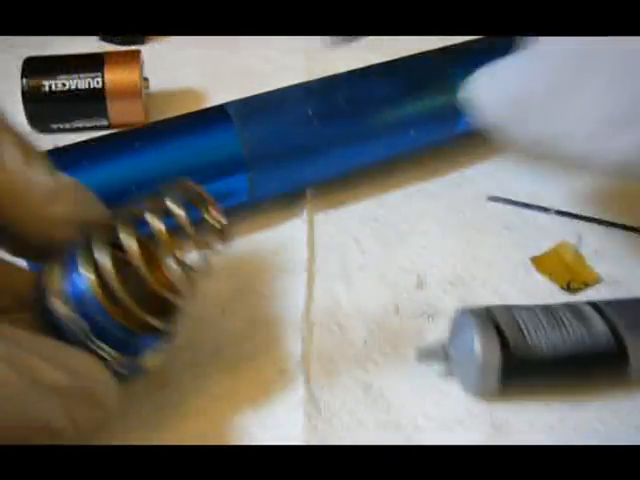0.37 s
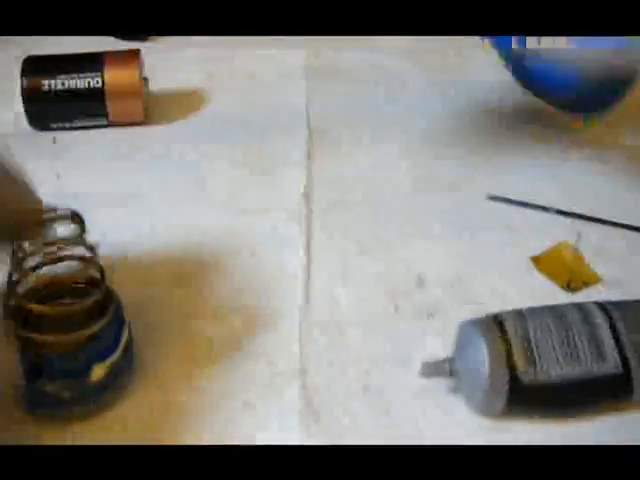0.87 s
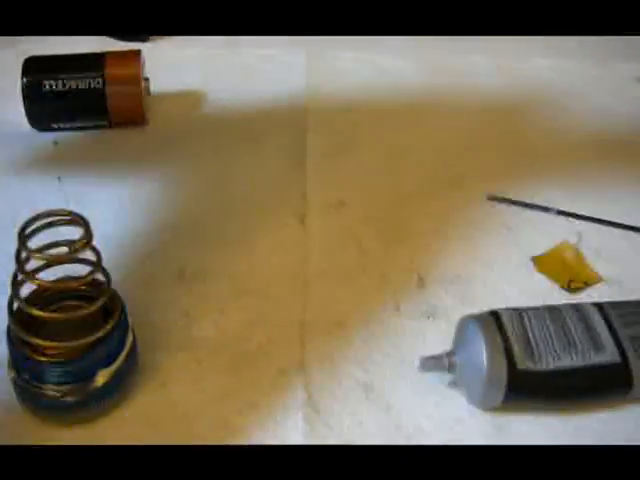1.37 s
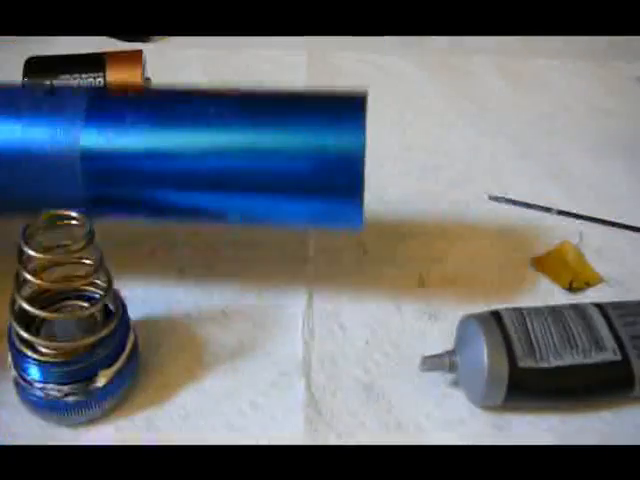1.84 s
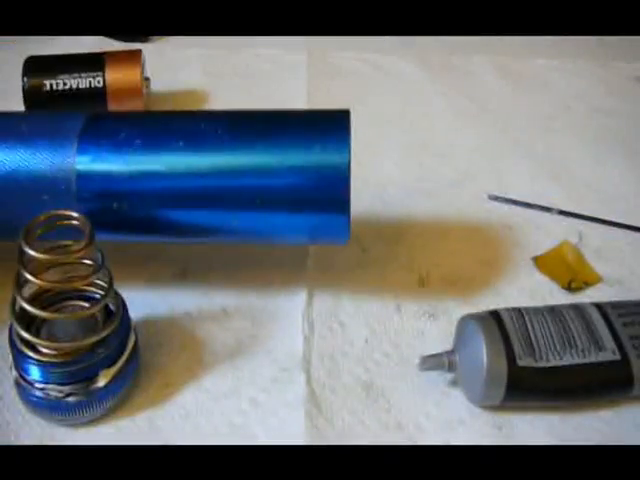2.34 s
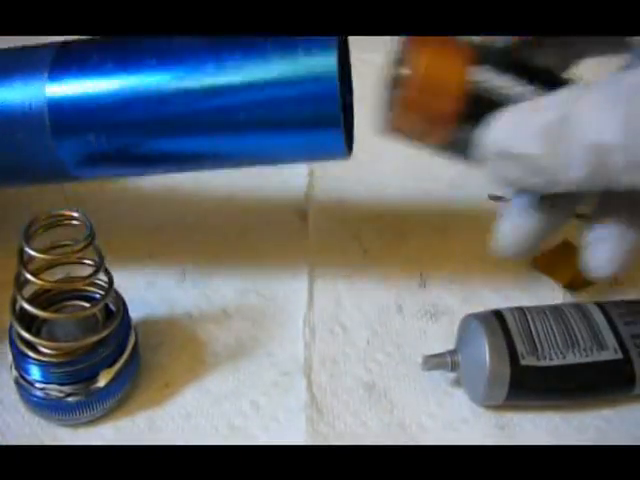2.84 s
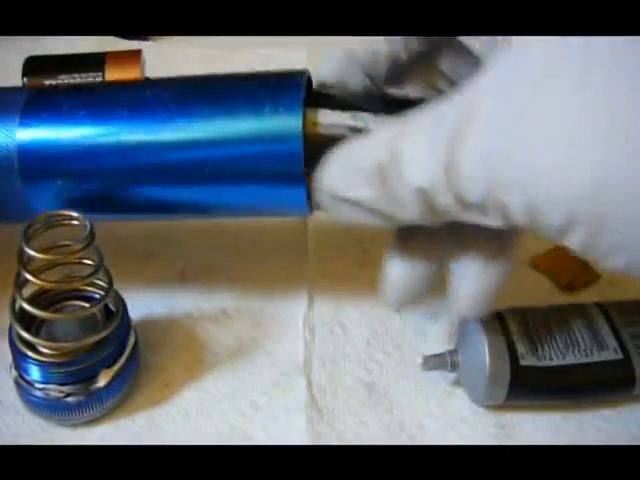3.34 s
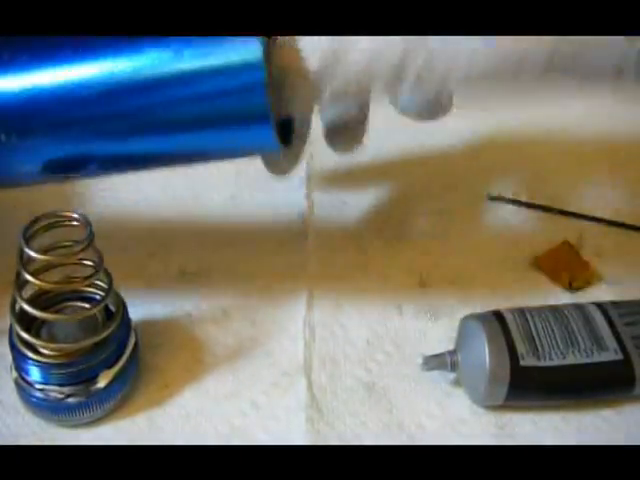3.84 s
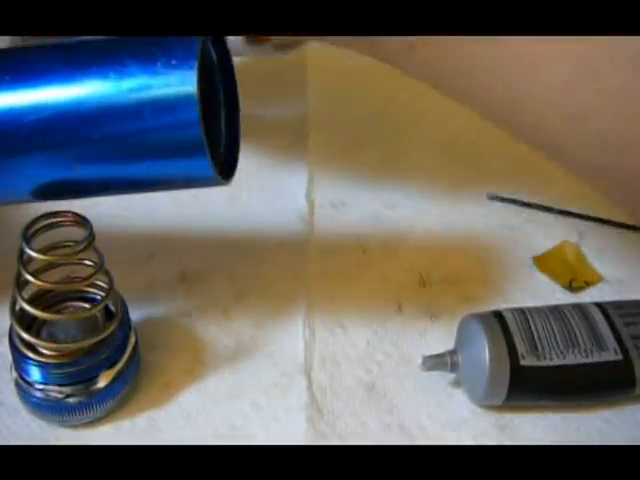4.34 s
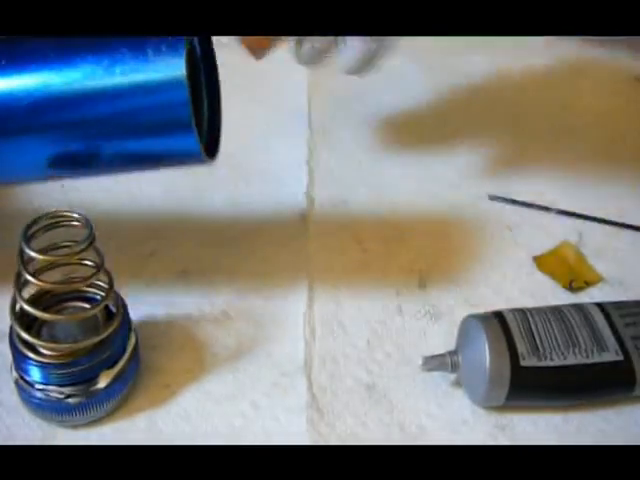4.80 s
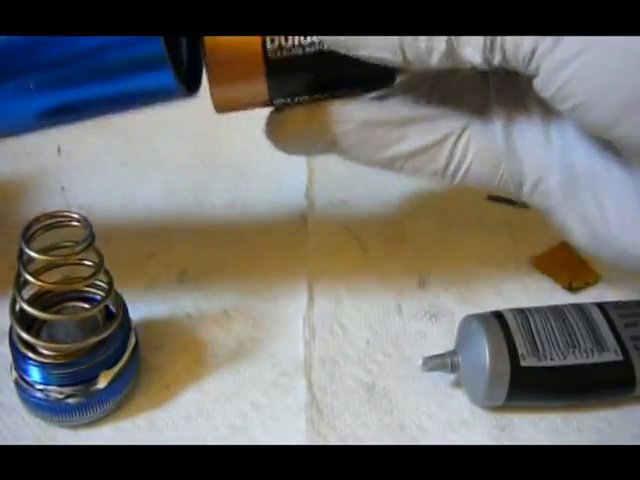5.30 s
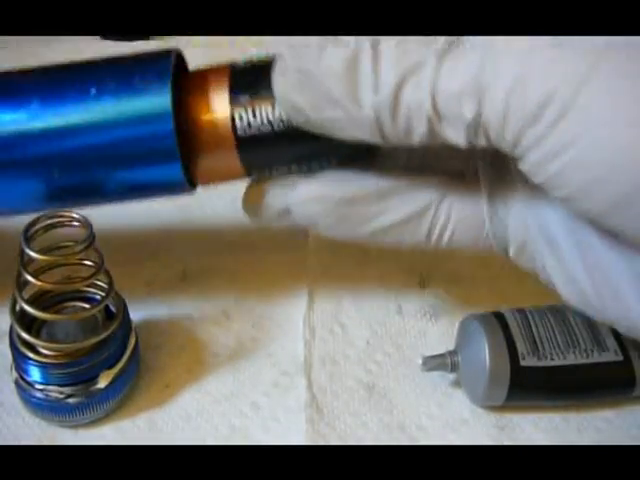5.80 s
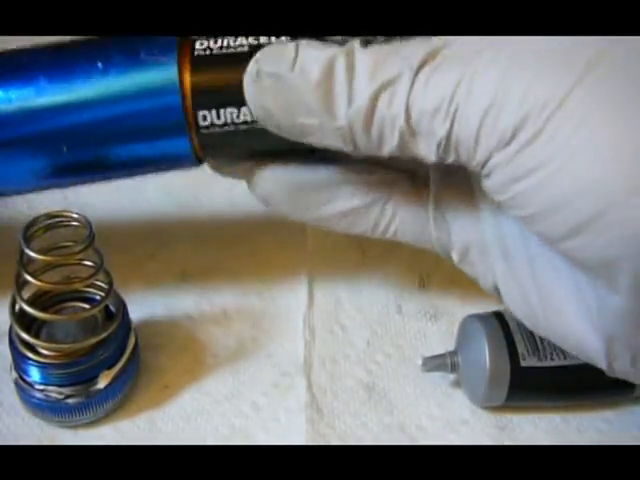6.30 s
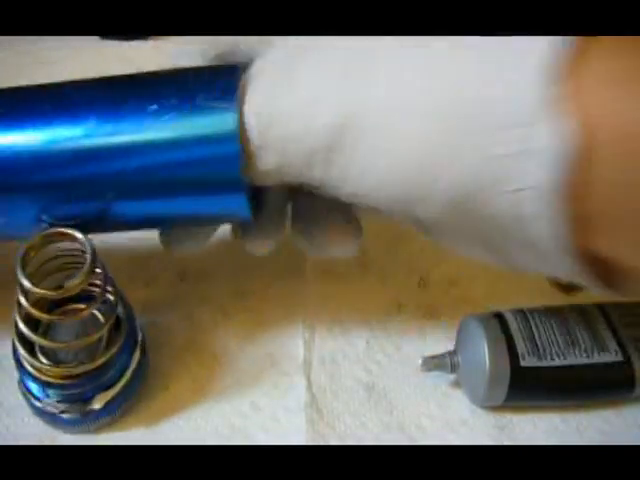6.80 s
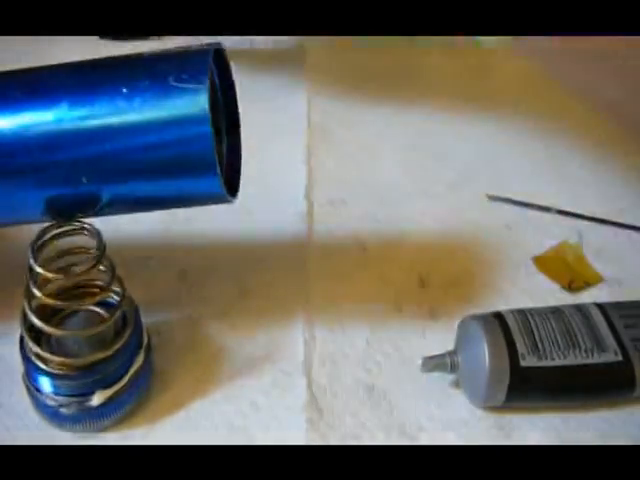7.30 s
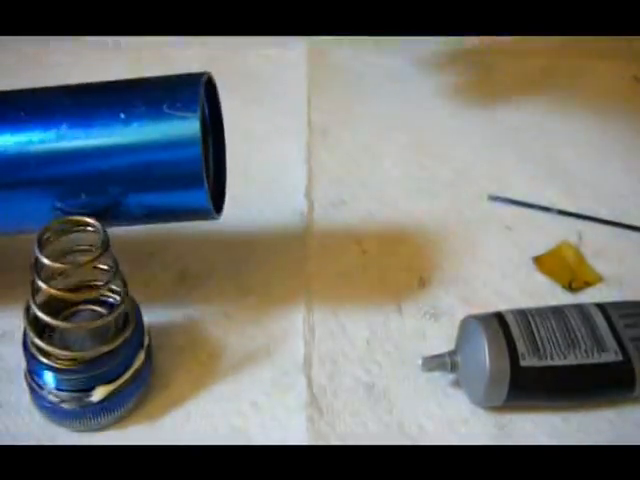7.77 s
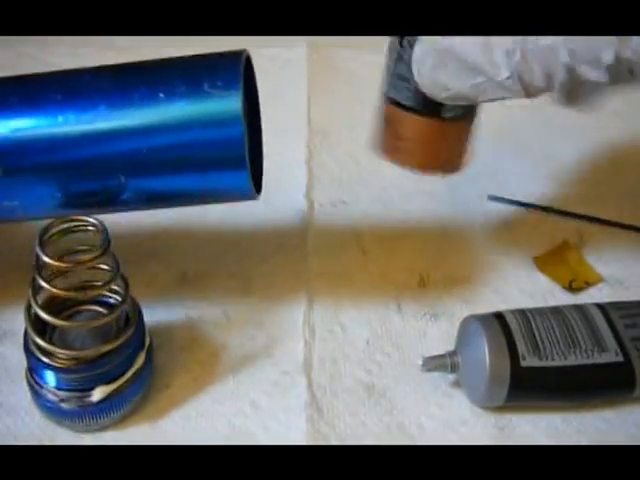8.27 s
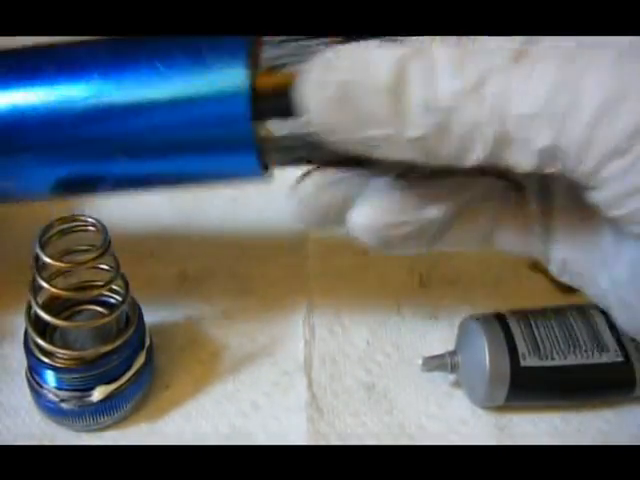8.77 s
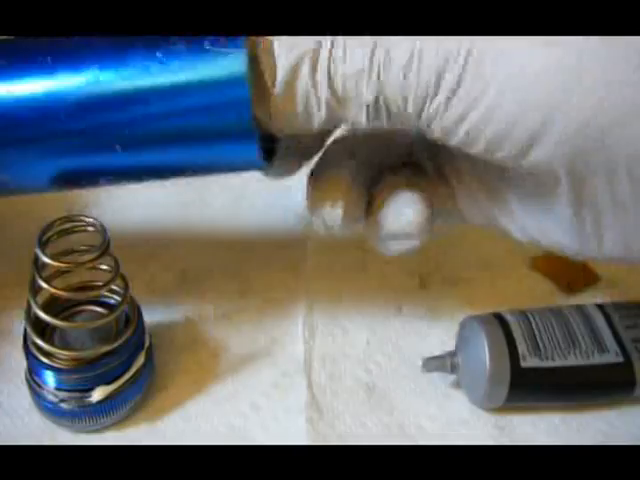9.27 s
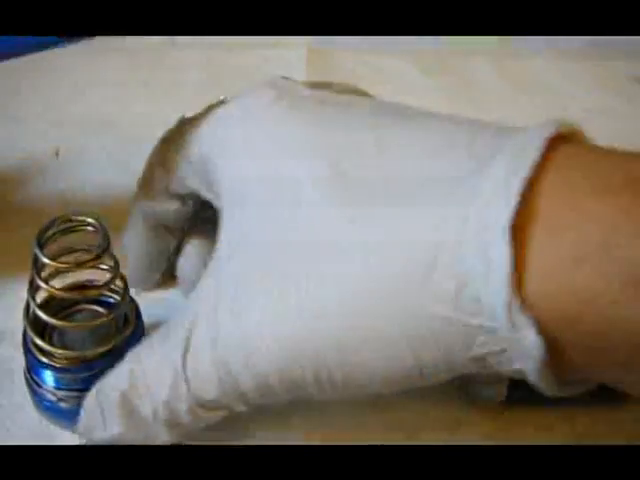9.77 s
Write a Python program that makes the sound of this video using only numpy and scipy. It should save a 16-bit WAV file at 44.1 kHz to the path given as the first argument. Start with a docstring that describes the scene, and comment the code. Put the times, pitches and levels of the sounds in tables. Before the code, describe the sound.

Close, gritty small-camera sound in a quiet room. A rough scrape and knocks open it, then near silence. A solid knock follows, then three clusters of metallic clinks and short rattles as batteries enter a metal tube, with padded table thumps beneath. Faint glove scuffs and steady hush fill the gaps before a last busy clatter and soft thud.

```python
"""Batteries into a metal tube

Gloved hands slide steel-cased batteries into an aluminium tube held over a padded table in a quiet room.
Each contact rings decaying tube modes near 2 kHz with a dull knock and a crack; runs of light touches rattle.
Blows boom in the table's own modes, while random slips make the rumble of drags and the scuffs of a glove.
Shaped noise makes the hush. A small camera clips and samples at 8 kHz, then straight lines join the samples,
which mirrors the sound into the treble."""
import sys
import numpy as np
from scipy import signal
from scipy.fft import rfft, irfft
from scipy.io import wavfile
from scipy.ndimage import map_coordinates

SR = 44100
rng = np.random.default_rng(int(sys.argv[2]) if len(sys.argv) > 2 else 0)


def store_pcm(level_fs):
    """Save levels as 16-bit WAV."""
    pcm = np.round(np.clip(level_fs, -1, 1) * 32767).astype(np.int16)
    wavfile.write(sys.argv[1], SR, np.atleast_2d(pcm).T)


def convert_level_to_amplitude(level_db):
    """Map a level in decibels to its linear amplitude factor."""
    exponent = np.asarray(level_db, float) / 20
    return 10 ** exponent


N = 435708   # length [samples]

# colour of the room hush: (frequency [Hz], relative density [dB])
HUSH_COLOUR = [(15, -53), (25, -6.5), (55, -13), (97, -10), (171, -8), (211, -6.5), (245, -4.5), (309, -6),
               (462, -7), (817, -4.5), (947, -7), (1070, -7.5), (3900, -13.5), (5070, -34), (8580, -120)]
# how loud the hush is between 1.2 and 3 kHz: (time [s], level [dB])
HUSH_LEVEL = [(0, -48.5), (1, -49.5), (3.5, -45), (3.68, -53), (3.85, -50), (6.85, -49.5), (7.1, -54.5),
              (7.5, -51.5), (8.7, -49), (9.3, -51.5), (9.88, -49.5)]
# low table modes: (frequency [Hz], level [dB], t60 [s])
BOOM_MODES = [(109.8, -6, 0.22), (129.7, -6, 0.12)]
# modes of the table board: (frequency [Hz], level [dB], t60 [s])
BOARD_MODES = [(198.2, -9.5, 0.18), (238.3, -9, 0.076), (303.4, -3.5, 0.053), (405.5, -7.5, 0.068),
               (502, -5.5, 0.022)]
# blows that reach the table top: (time [s], boom [dB], board [dB], board pitch favoured by the spot [Hz])
TABLE_THUMPS = [(0.408, -28, -37, 200), (0.664, -20, -19.5, 195), (0.682, -24, -21.5, 195),
                (0.886, -37, -48, 198), (2.177, -9.5, -15, 276), (2.205, -34, -16, 247),
                (2.956, -33, -12.5, 408), (2.981, -17, -15, 350), (3.254, -23, -43, 300),
                (3.297, -24, -26, 250), (3.367, -23, -25, 300), (3.728, -26, -26, 250),
                (4.315, -26.5, -31, 200), (4.952, -55, -20, 300), (5.002, -45, -27, 250),
                (5.307, -55, -31, 239), (5.041, -22, -6, 340), (5.071, -38, -25, 300),
                (5.684, -49, -20.5, 347), (5.849, -25, -17.5, 260), (5.93, -40, -19, 260),
                (6.367, -52, -26, 450), (6.44, -26, -15.5, 280), (6.704, -33, -16, 300),
                (7.997, -37.5, -25.5, 218), (8.978, -35, -22, 300), (9.11, -56, -22.5, 453),
                (9.196, -53, -23, 422), (9.52, -27, -20, 250), (9.535, -39, -27, 220)]
# jolts that shift things on the pad, which then settle:
# (time [s], table boom [dB], board [dB], tube scrape [dB], fade [dB/s])
PAD_JOLTS = [(0.09, -52, -31.5, -40, 141), (0.292, -62, -65, -37, 48), (2.99, -27.5, -34, -37.5, 101),
             (3.28, -33, -33.5, -39.5, 73), (5.05, -30, -19.5, -31.5, 261), (5.848, -40, -34, -41.5, 71),
             (6.22, -35, -28, -31, 180), (6.441, -57, -28.5, -31.5, 180), (6.71, -38.5, -32, -35, 72),
             (7.43, -38.5, -33.5, -53, 75), (3.44, -42, -45, -55, 53), (8.69, -58, -55, -41, 203),
             (8.97, -64, -43, -47, 81)]
# a hand drags or presses, swelling and easing:
# (start [s], length [s], table boom [dB], board [dB], tube scrape [dB])
HAND_SLIDES = [(-0.03, 0.083, -24.5, -14, -12.5), (.04, 0.052, -28, -13.5, -22.5),
               (0.4, 0.72, -60, -61, -47), (1.7, 0.43, -65, -62, -49), (2.448, 0.22, -51, -70, -57),
               (2.76, 0.19, -37.5, -48, -60), (3.708, 0.19, -39, -41, -47), (3.881, .27, -32, -34.5, -36.5),
               (4.08, 0.21, -45, -51.5, -70), (4.3, 0.33, -50, -53.5, -50.5),
               (6.86, 0.18, -39.5, -42.5, -71), (7.485, 0.31, -61, -40.5, -72)]
# a glove scuffs along the tube and stirs the air inside: (start [s], length [s], level [dB])
GLOVE_SCUFFS = [(2.8, 0.15, -50), (2.97, 0.18, -44), (3.72, 0.086, -38), (3.89, .24, -36),
                (7.432, .04, -36.5), (7.505, 0.039, -36.5)]
# resonances of the air in the tube: (frequency [Hz], level [dB], t60 [s])
AIR_COLUMN_MODES = [(886, -0.5, .05), (931, 5.5, 0.024), (1148, -6, 0.037)]
# ringing modes of the tube wall: (frequency [Hz], level [dB], t60 [s])
WALL_MODES = [(1844, -3.5, 0.025), (1941, -6, 0.036), (1992, -5.5, 0.057), (2050, -3, 0.028)]
# upper ring, heard on blows near the open rim: (frequency [Hz], level [dB], t60 [s])
RIM_MODES = [(3434, 2, 0.19)]
# dull knock of a contact: (frequency [Hz], level [dB], t60 [s])
KNOCK_MODES = [(635, -4, 0.032), (765, -0.5, 0.023), (875, -10.5, 0.041), (935, -7, 0.042),
               (1053, -8, 0.043), (1222, -7.5, 0.033), (1361, -7, 0.018), (1622, -13, 0.047)]
# bright crack of a contact: (frequency [Hz], level [dB], t60 [s]; ring() lengthens any below 5 ms)
CRACK_MODES = [(2238, -1, 0.031), (2400, -2, 0.022), (2693, -9, 0.023), (2993, -6, 0.017),
               (3347, -5.5, 0.023), (3890, 1.5, 0.0031)]
# single blows of battery or hand on the tube: (time [s], knock [dB], wall ring [dB], crack [dB])
TUBE_CONTACTS = [(0.054, -10.5, -37, -41), (0.145, -23, -56, -60), (0.194, -28, -67, -61),
                 (0.223, -15.5, -23, -24), (0.287, -17, -27, -25.5), (0.333, -30, -31.5, -28.5),
                 (0.498, -60, -60, -40), (1.319, -34, -41, -41), (2.178, -10.5, -16.5, -24.5),
                 (2.956, -28, -11, -25.5), (3.256, -15, -7, -19), (3.368, -20, -13, -41),
                 (3.38, -12.5, -10.5, -35), (3.392, -23, -11.5, -20.5), (3.467, -17.5, -14, -30),
                 (3.502, -23.5, -15, -18), (3.559, -24.5, -15.5, -17), (3.732, -26, -56, -45),
                 (3.803, -24, -24.5, -41), (4.32, -32, -62, -60), (4.954, -19.5, -13.5, -20.5),
                 (4.997, -21, -14.5, -32), (5.01, -17, -20, -32), (5.041, -16, -39, -44),
                 (5.095, -30, -38.5, -54), (5.293, -41, -35, -54), (5.307, -27, -33.5, -52),
                 (5.684, -23, -17.5, -34), (5.702, -22, -10, -23), (5.737, -25, -19.5, -45),
                 (5.85, -25, -34.5, -46), (6.213, -21, -20.5, -42), (6.368, -15.5, -16, -41),
                 (6.391, -30, -7, -31), (6.4, -19, -14.5, -21.5), (6.431, -20.5, -14.5, -30),
                 (6.685, -22, -15, -32), (6.708, -16.5, -12.5, -29), (6.764, -23, -10, -19),
                 (6.823, -31, -30, -38), (6.898, -20.5, -21, -28.5), (6.945, -21, -24, -27.5),
                 (7.773, -40, -46, -37), (7.84, -50, -42, -40), (8.616, -28, -27, -43),
                 (9.154, -44, -37, -38), (6.46, -46, -49, -29), (6.485, -32, -36, -34),
                 (6.722, -27, -9.5, -21), (6.738, -21, -21, -25), (3.276, -25, -13.5, -39),
                 (3.52, -29, -28, -25), (8.598, -22, -29, -35), (8.645, -15, -25, -24.5),
                 (8.662, -18, -10.5, -46), (8.688, -14.5, -24, -21), (8.807, -15, -14.5, -27),
                 (8.822, -30, -16.5, -38.5), (8.879, -21.5, -13, -50), (8.978, -21.5, -47, -37.5),
                 (9.008, -20, -20, -23), (9.025, -24.5, -31, -40), (9.107, -18.5, -22, -21.5),
                 (9.196, -25, -32, -48), (9.214, -30, -29.5, -30)]
# the battery chatters against the wall as it slides:
# (start [s], length [s], knock [dB], wall ring [dB], crack [dB])
BATTERY_RATTLES = [(0.228, .015, -26, -38, -31.5), (0.292, .09, -31, -37, -36),
                   (2.186, .04, -24.5, -45, -51), (3.26, 0.0547, -23.5, -15.5, -44),
                   (3.399, 0.027, -29.5, -32, -47), (3.434, .03, -26, -19.5, -47),
                   (3.472, 0.047, -28, -15, -33), (6.354, 0.019, -28, -42, -55),
                   (6.677, .012, -31, -22.5, -47), (3.567, 0.028, -26.5, -26, -48),
                   (4.961, 0.019, -23.5, -27, -45), (5.702, 0.018, -25, -21, -35),
                   (6.713, 0.076, -29, -18, -38), (8.665, 0.045, -28, -17.5, -54),
                   (8.826, 0.015, -24, -28, -22.5)]
# blows near the open rim: (time [s], level [dB])
RIM_CONTACTS = [(2.956, -41), (3.256, -39), (3.276, -41), (3.493, -48), (4.954, -31.5), (4.997, -43),
                (5.293, -42), (5.307, -41), (5.684, -36), (6.748, -37), (6.778, -38), (8.645, -36.5),
                (8.662, -35), (8.695, -42), (8.807, -44), (8.833, -39)]

ROOM_T60_S, ROOM_DB = 0.16, -11
SPOT_DB_PER_OCTAVE = 9   # board modes away from the favoured pitch are weaker
JOLT_ATTACK_S, SLIDE_ROUNDNESS = 0.0014, 1.43   # roundness is the exponent on a half sine
TOUCHES_PER_S, TOUCH_SPREAD_DB, TOUCH_FADE_DB = 150, 2.5, 7   # fade over the length of a rattle
CAMERA_RATE_HZ = 8000


def hush():
    """Room air and microphone hiss: noise shaped on the spectrum, its level drifting over time."""
    hz = np.arange(1, N // 2 + 2) * SR / N
    colour_hz, colour_db = np.transpose(HUSH_COLOUR)
    shape = convert_level_to_amplitude(np.interp(np.log(hz), np.log(colour_hz), colour_db))
    noise = irfft(rfft(rng.standard_normal(N)) * shape, N)
    noise = noise / np.sqrt(np.mean(noise ** 2) + 1e-20)
    # the level table speaks of this band, so divide by the band's share of the whole
    in_band = (hz > 1200) & (hz < 3000)
    band_rms = np.sqrt(np.sum(shape[in_band] ** 2) / np.sum(shape ** 2))
    level_s, level_db = np.transpose(HUSH_LEVEL)
    gain = convert_level_to_amplitude(np.interp(np.arange(N) / SR, level_s, level_db))
    return gain / band_rms * noise


def room(x):
    """Reflections as a dense short tail of decaying noise, starting 4 ms after the direct sound."""
    t = np.arange(SR // 2) / SR
    tail = rng.standard_normal(len(t)) * convert_level_to_amplitude(-60 * t / ROOM_T60_S) * (t > 0.004)
    tail = tail / np.sqrt(np.sum(tail ** 2))
    return convert_level_to_amplitude(ROOM_DB) * signal.fftconvolve(x, tail)[:N]


def ring(push, hz, t60):
    """A damped resonance: a unit click sets a sine of height 1 ringing, t60 being 5 ms at least."""
    radius = convert_level_to_amplitude(-60 / (max(t60, 0.005) * SR))
    angle = 2 * np.pi * hz / SR
    # the tiny offset keeps the filter clear of vanishingly small numbers
    return signal.lfilter([0, np.sin(angle)], [1, -2 * radius * np.cos(angle), radius ** 2], push + 1e-18)


def strike(events, modes, column, spread_db, contact_s):
    """A blow lasts a moment: it reaches each mode at an instant, sign and strength of its own."""
    events, out = np.array(events), np.zeros(N)
    late = rng.random((len(events), len(modes))) ** 2 * contact_s
    strength = spread_db * rng.standard_normal((len(events), len(modes)))
    sign = rng.choice([-1, 1], (len(events), len(modes)))
    for k, (hz, level_db, t60) in enumerate(modes):
        clicks = np.zeros(N)
        at = np.round((events[:, 0] + late[:, k]) * SR).astype(int)
        height = convert_level_to_amplitude(events[:, column] + level_db + strength[:, k])
        np.add.at(clicks, at, sign[:, k] * height)
        out += ring(clicks, hz, t60)
    return out


def rub(modes, force, slips_per_s):
    """Friction as dense uneven slips that excite the modes, scaled by the force applied."""
    happens = rng.random(N) < slips_per_s / SR
    height = convert_level_to_amplitude(2.5 * np.minimum(rng.exponential(1, N), 3))
    slips = happens * height * rng.choice([-1, 1], N)
    steady = sum(convert_level_to_amplitude(level_db) * ring(slips, hz, t60) for hz, level_db, t60 in modes)
    pressed = sum(convert_level_to_amplitude(level_db) * ring(slips * force, hz, t60) for hz, level_db, t60 in modes)
    return pressed / np.std(steady)   # a constant force of 1 would give unit level


def arches(strokes, column):
    """Strokes of a hand whose force rises and falls in a rounded arch."""
    t, out = np.arange(N) / SR, np.zeros(N)
    for stroke in strokes:
        progress = np.clip((t - stroke[0]) / stroke[1], 0, 1)
        out += convert_level_to_amplitude(stroke[column]) * np.sin(np.pi * progress).clip(0) ** SLIDE_ROUNDNESS
    return out


def pressure(slide_column, jolt_column):
    """Rubbing force: slides swell and ease, jolts start almost at once and fade."""
    t, force = np.arange(N) / SR, arches(HAND_SLIDES, slide_column)
    for jolt in PAD_JOLTS:
        age = np.maximum(t - jolt[0], 0)
        force += np.minimum(age / JOLT_ATTACK_S, 1) * convert_level_to_amplitude(jolt[jolt_column] - jolt[4] * age)
    return force


def table():
    """The padded top booms and knocks in its own modes; the padding takes the edge off each blow."""
    time_s, _, board_db, spot_hz = np.transpose(TABLE_THUMPS)
    top = strike(TABLE_THUMPS, BOOM_MODES, column=1, spread_db=1.5, contact_s=0.003)
    for mode in BOARD_MODES:
        octaves_off = abs(np.log2(mode[0] / spot_hz))
        blows = np.column_stack([time_s, board_db - SPOT_DB_PER_OCTAVE * octaves_off])
        top += strike(blows, [mode], column=1, spread_db=2.0, contact_s=0.0032)
    top += rub(BOOM_MODES, pressure(slide_column=2, jolt_column=1), slips_per_s=800)
    top += rub(BOARD_MODES, pressure(slide_column=3, jolt_column=2), slips_per_s=1500)
    return signal.sosfilt(signal.butter(2, 700, fs=SR, output="sos"), top)


def rattle_touches(count):
    """Each rattle is a fading run of unevenly spaced light contacts, in rows like the single blows."""
    rattles = np.array(BATTERY_RATTLES)
    age = (np.arange(count) + rng.random((len(rattles), count))) / TOUCHES_PER_S
    share = age / rattles[:, 1:2]
    loss_db = np.where(share < 1, TOUCH_FADE_DB * share, 200)   # silent past the end of the rattle
    loss_db = loss_db + TOUCH_SPREAD_DB * rng.standard_normal(age.shape)
    times = (rattles[:, :1] + age).ravel()
    levels = [(rattles[:, k:k + 1] - loss_db).ravel() for k in (2, 3, 4)]
    return np.column_stack([times] + levels)


def tube():
    """Metal on metal: wall rings, a short knock and a crack at the contacts; rubbing stirs them too."""
    blows = np.vstack([TUBE_CONTACTS, rattle_touches(count=24)])
    out = strike(blows, WALL_MODES, column=2, spread_db=3.0, contact_s=0.0022)
    out += strike(RIM_CONTACTS, RIM_MODES, column=1, spread_db=1.5, contact_s=0.002)
    out += strike(blows, KNOCK_MODES, column=1, spread_db=2.5, contact_s=0.0035)
    out += strike(blows, CRACK_MODES, column=3, spread_db=2.5, contact_s=0.004)
    # a scrape favours the knock modes; wall and crack sound 16 dB fainter in it
    faint = [(hz, level_db - 16, t60) for hz, level_db, t60 in WALL_MODES + CRACK_MODES]
    out += rub(KNOCK_MODES + faint, pressure(slide_column=4, jolt_column=3), slips_per_s=3000)
    out += rub(AIR_COLUMN_MODES, arches(GLOVE_SCUFFS, column=2), slips_per_s=300)
    return out


def scene():
    """Tube and table in the room, over the hush; small bodies radiate no deep bass."""
    deep_bass_cut = signal.butter(4, 82, "high", fs=SR, output="sos")
    near = signal.sosfilt(deep_bass_cut, table() + tube())
    return (near + room(near) + hush())[None]


def top_cut(x):
    """Nothing passes above the cut-off."""
    return signal.sosfilt(signal.butter(12, 15700, fs=SR, output="sos"), x)


def record(dry):
    """Camera sound: band limit, lopsided overload, coarse sampling, straight lines between samples."""
    limited = signal.sosfilt(signal.butter(6, 3800, fs=SR, output="sos"), dry[0])
    clipped = np.clip(limited, -0.38, 0.44)
    coarse_at = np.arange(0, N, SR / CAMERA_RATE_HZ)
    coarse = map_coordinates(clipped, [coarse_at], order=3)
    # the corners of the straight lines leave mirror images above 4 kHz
    mix = np.interp(np.arange(N), coarse_at, coarse)[None]
    return top_cut(mix)


dry = scene()
out = record(dry)
store_pcm(out)
```